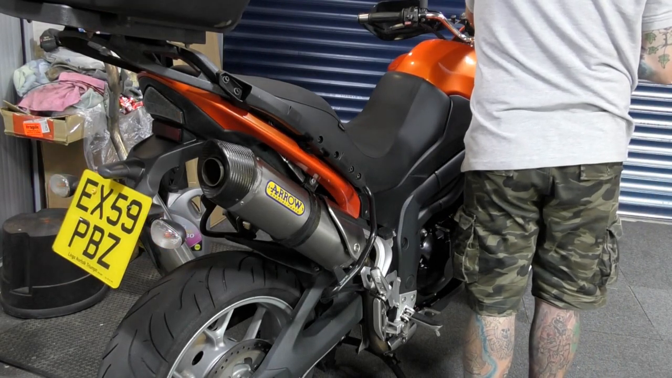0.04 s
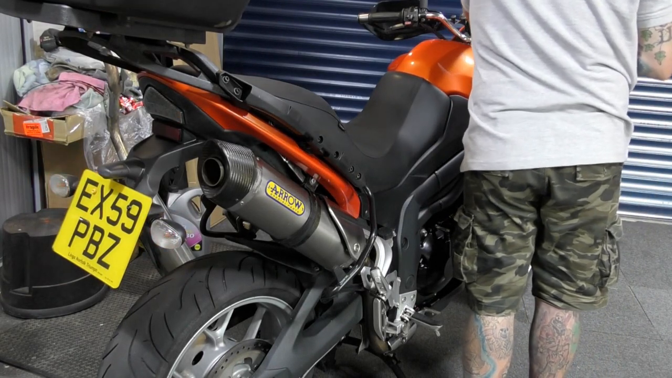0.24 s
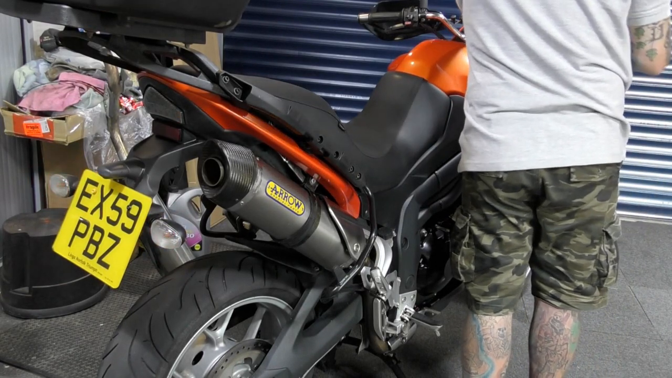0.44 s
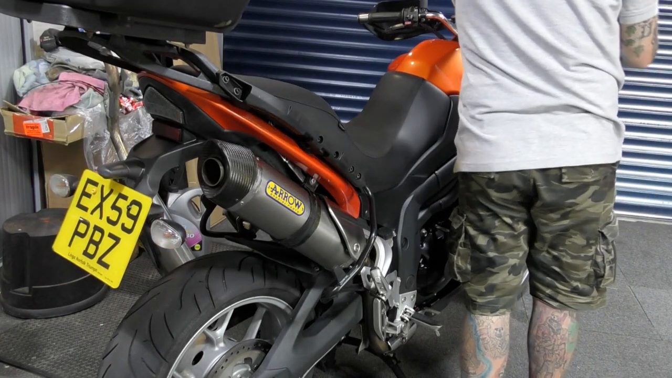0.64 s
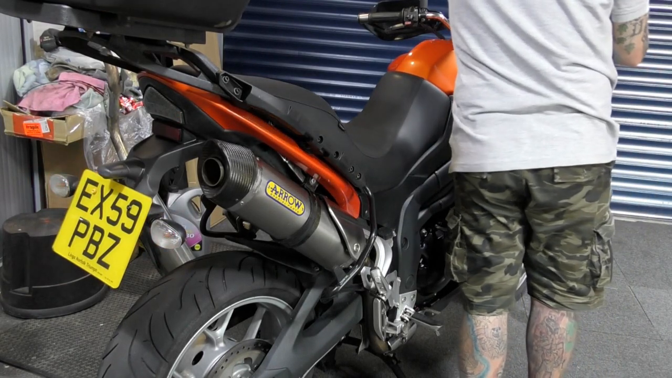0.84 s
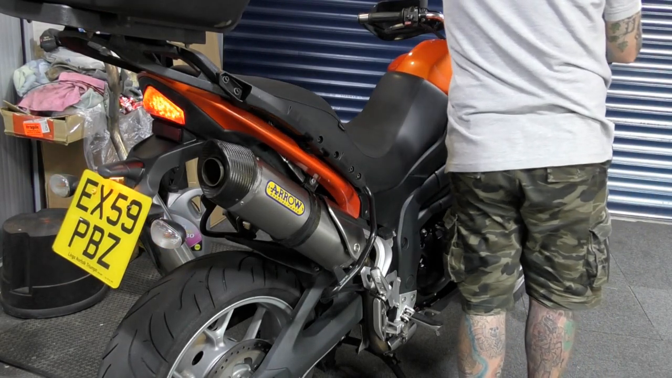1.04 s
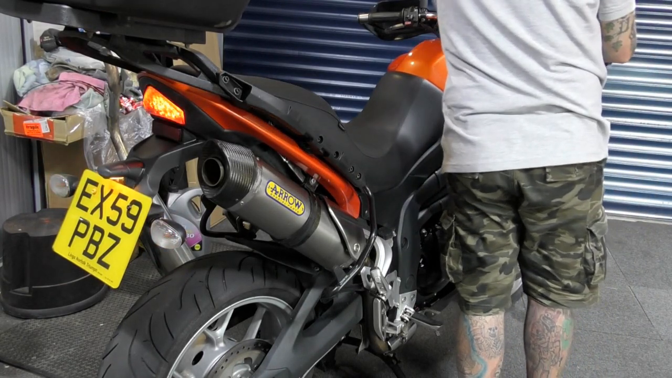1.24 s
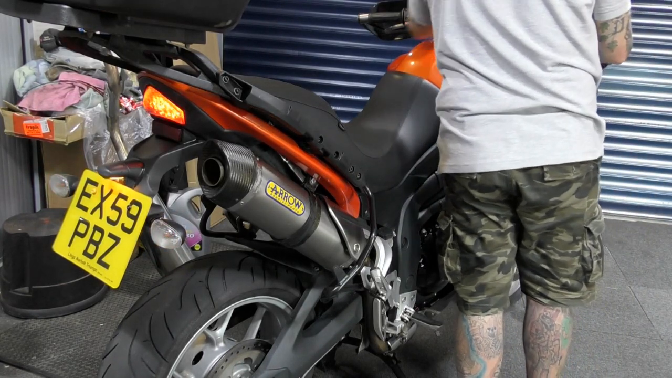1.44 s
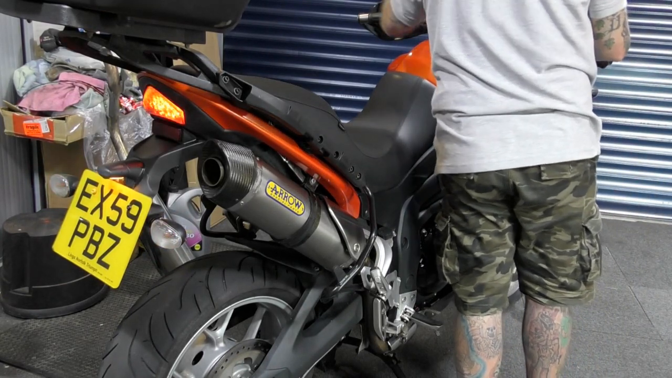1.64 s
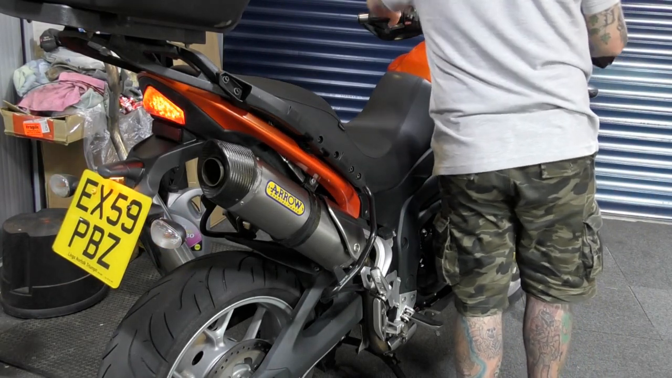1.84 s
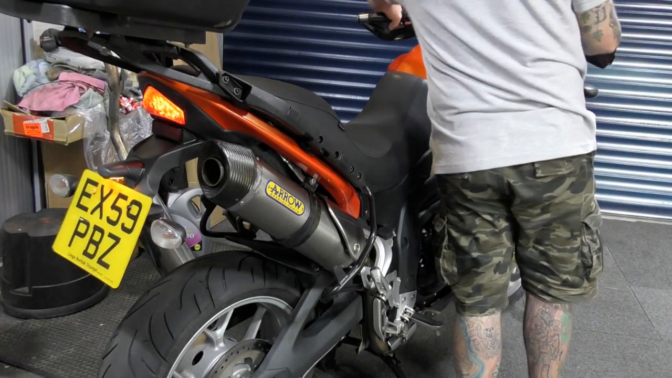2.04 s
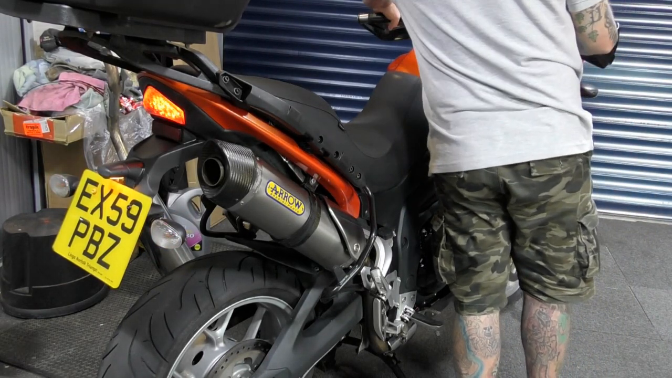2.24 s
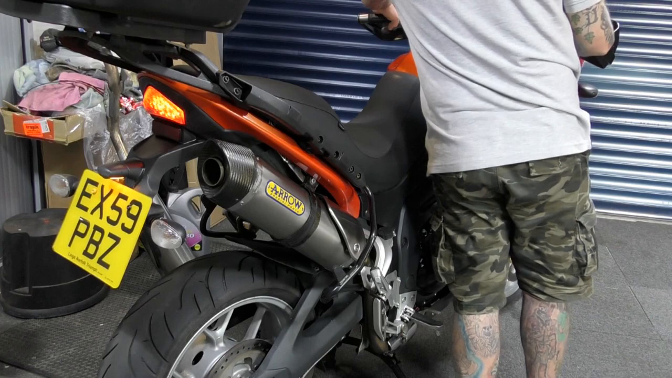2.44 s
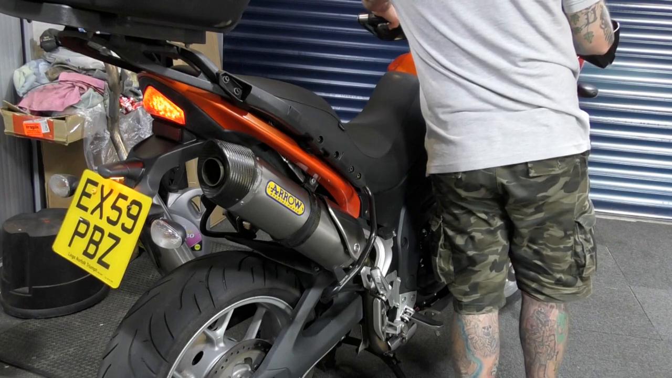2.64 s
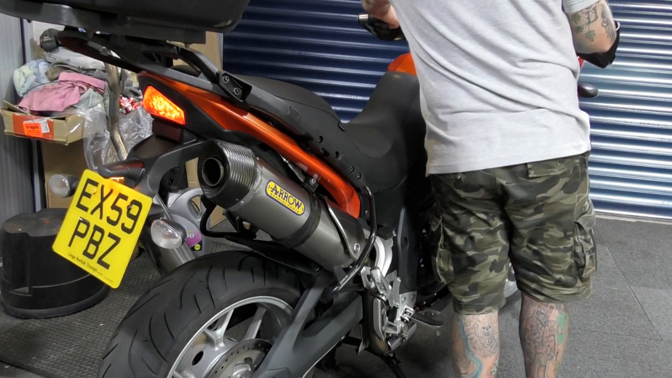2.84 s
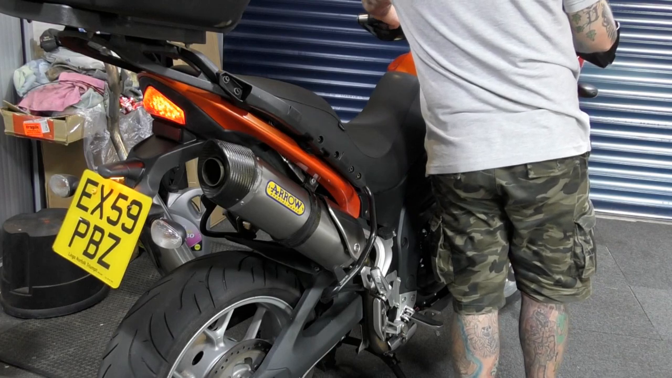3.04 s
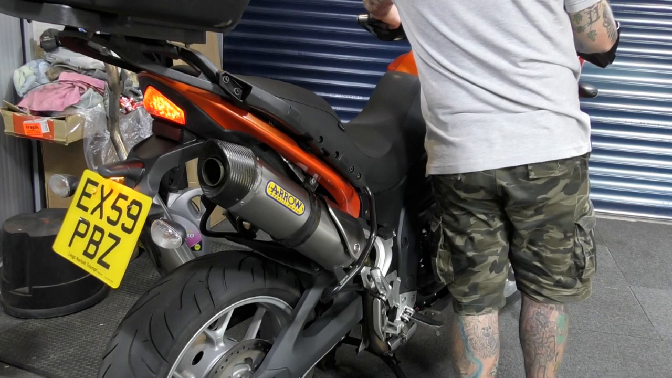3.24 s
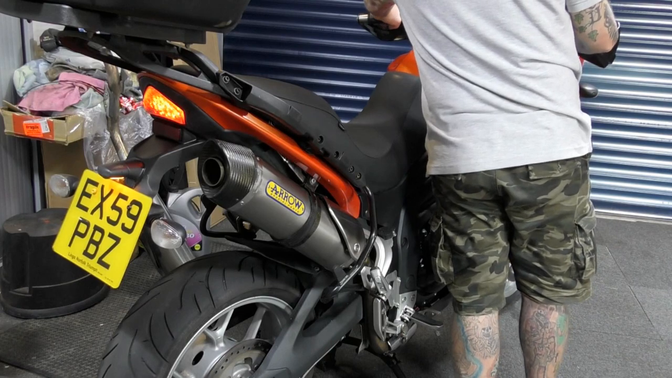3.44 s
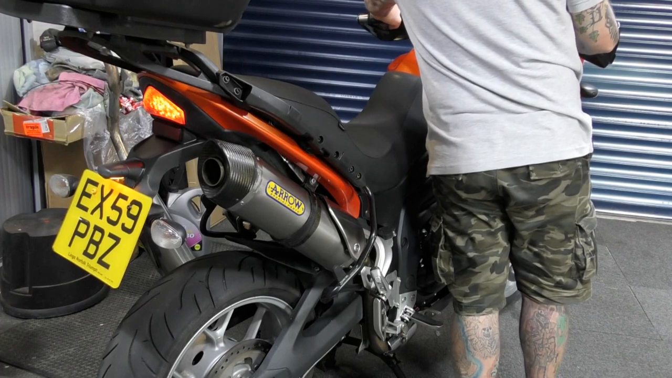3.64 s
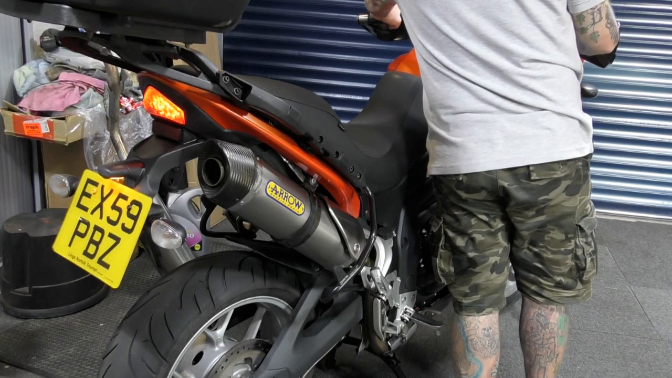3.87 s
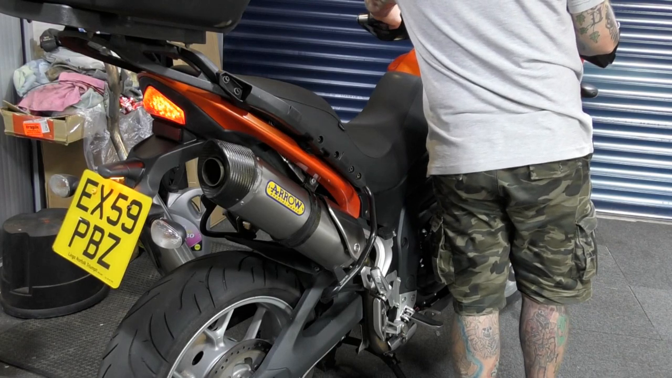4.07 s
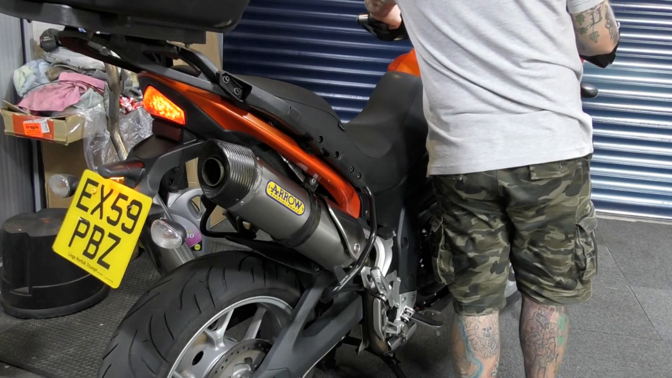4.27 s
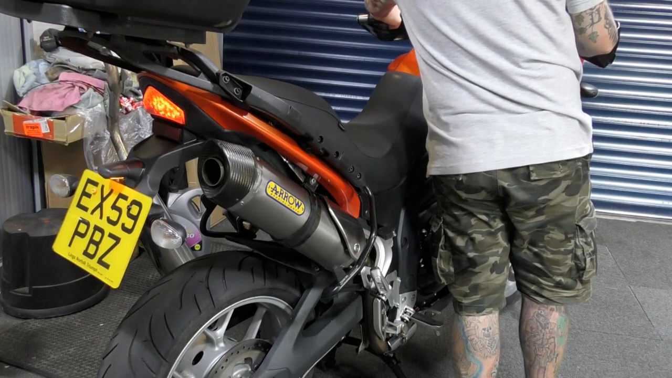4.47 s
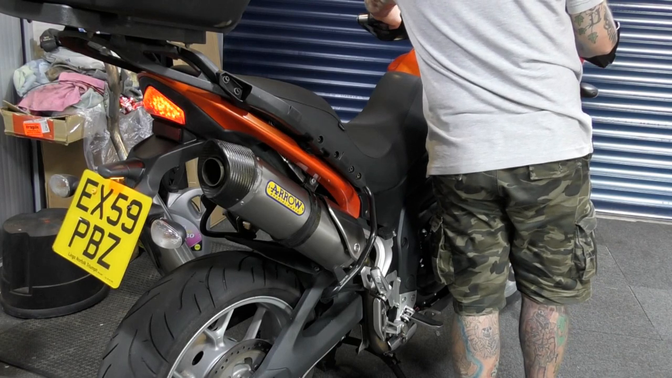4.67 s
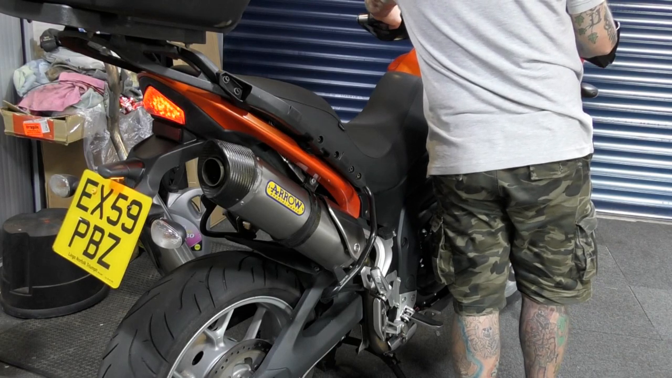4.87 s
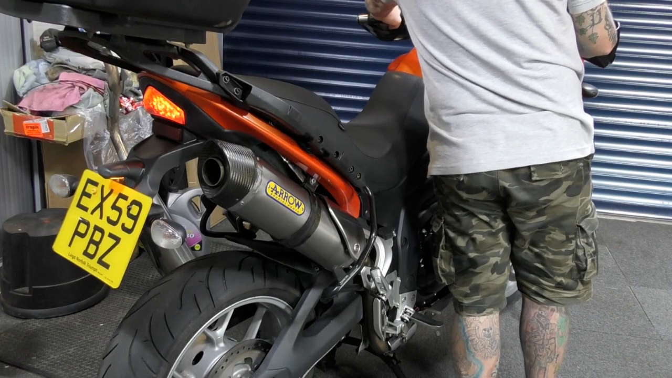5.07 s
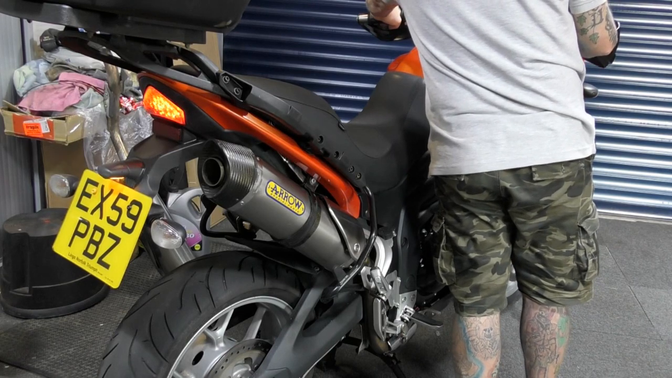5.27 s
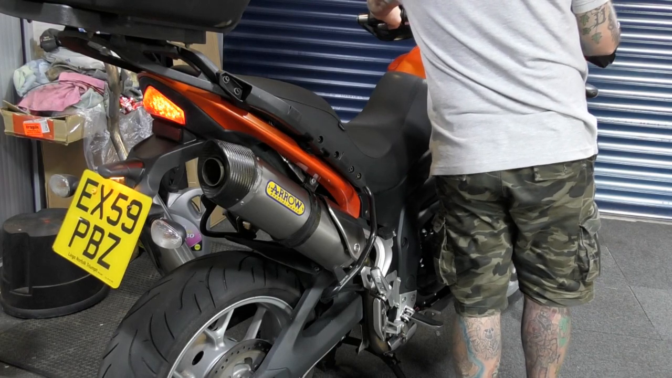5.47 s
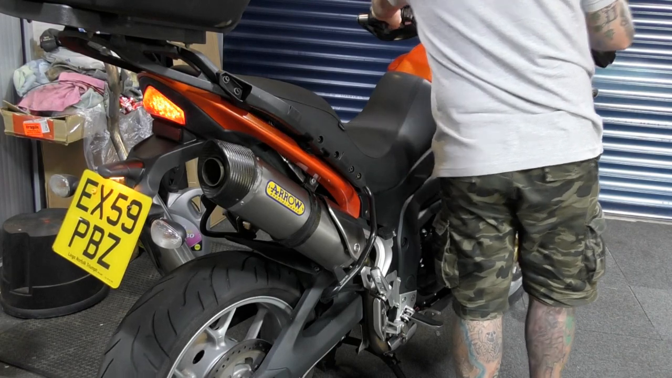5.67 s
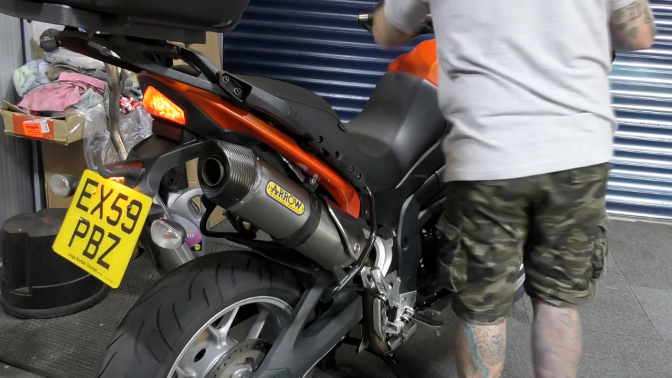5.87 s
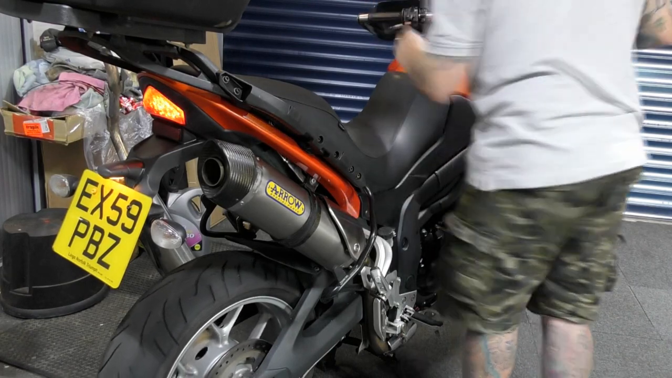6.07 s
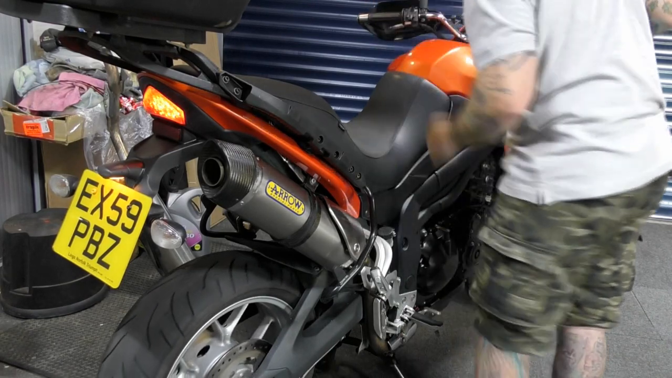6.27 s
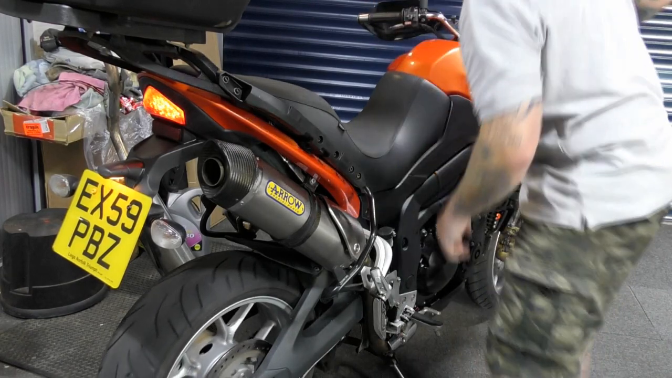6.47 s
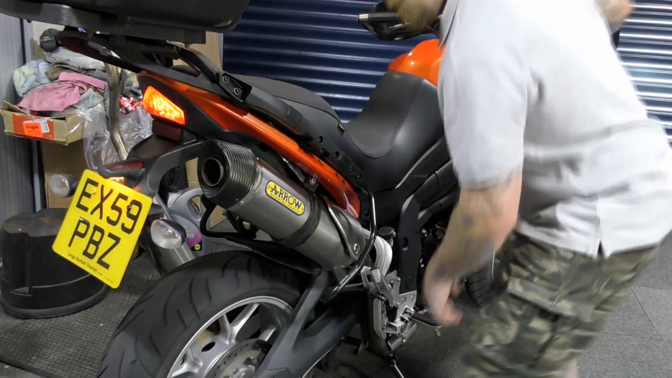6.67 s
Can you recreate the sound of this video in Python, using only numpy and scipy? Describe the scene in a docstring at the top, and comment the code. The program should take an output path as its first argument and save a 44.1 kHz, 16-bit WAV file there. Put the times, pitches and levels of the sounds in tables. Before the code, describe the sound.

Clicks and a faint high pump whine, a sharp clack, labouring starter motor, then a three-cylinder motorcycle engine booms alive and holds its throaty idle.

```python
"""A three-cylinder motorcycle engine starts in a garage, heard from behind its silencer.
Key and relays click as ringing rattles; the fuel pump primes as a thin vane whine over a rush of noise.
Gauge gears whirr as grains and the idle stepper hums. The starter grinds and sings through four
compressions, each with a puff and a clatter. Firing pulses then ring the pipe as the engine catches,
flares and settles into a fast, deep idle, with valve-gear ticks and the starter's freewheel rasp."""
import sys
import numpy as np
from scipy import signal
from scipy.fft import rfft, irfft
from scipy.io import wavfile

SR = 44100
rng = np.random.default_rng(int(sys.argv[2]) if len(sys.argv) > 2 else 0)


def unload_audio(sound):
    """Save the sound as a 16-bit wav file, at the path given as the first command line argument."""
    columns = np.transpose(np.atleast_2d(sound))
    # keep every value between -1 and 1, then stretch to whole-number steps
    steps = np.round(np.clip(columns, -1, 1) * 32767)
    wavfile.write(sys.argv[1], SR, steps.astype(np.int16))


N = 295911
T = np.arange(N) / SR

# Garage background spectrum: (frequency [Hz], level [dB])
AIR_SPECTRUM = [(15, -41), (25, -27), (53, -13), (70, -15.5), (113, -7), (174, -9.5), (234, -10.5),
                (360, -9.5), (585, -26), (901, -14.5), (2440, -18.5), (3110, -13.5), (3470, -22.5),
                (5200, -34), (15700, -26.5)]
AIR_DB = -61.5
# Echo decay: (frequency [Hz], t60 [s])
GARAGE_T60 = [(100, 0.29), (400, 0.53), (1500, 0.29), (4000, 0.26), (12000, 0.19)]
# Stereo width: (frequency [Hz], side against mid [dB])
SIDE_SPECTRUM = [(60, -9.5), (300, -15.5), (1000, -12), (2500, -11.5), (4500, -9), (6500, -20.5),
                 (13000, -100)]
# Boom between floor, shutter and walls: (round trip [s], share passed straight on [1])
WALL_BOUNCES = [(.0115, .74), (.0155, .66)]
EDGE_HZ = 15830

# Key, switch and relay clicks: (time [s], level [dB], decay t60 [s], ring [Hz],
# ring over snap [dB], tilt above 1 kHz [dB/octave])
CLICKS = [(0.047, -51.5, 0.058, 4340, 9.5, -0.5), (0.062, -63, 0.029, 4330, 8, -15),
          (0.151, -55, 0.08, 1970, -7, -5.5), (0.415, -55, 0.087, 1500, -14, -4.5),
          (0.424, -52, 0.039, 1620, 3, -9), (0.98, -48, 0.049, 4200, -22, 0),
          (0.989, -30, 0.054, 8000, -12, 12), (0.992, -29, 0.055, 2040, -8, 2),
          (1.152, -42.5, 0.028, 1430, -13, -6), (1.185, -52.5, 0.19, 2000, -6, -5),
          (1.219, -51, 0.14, 4400, -1, -1.5), (1.248, -32.5, 0.034, 960, -21, 1.5),
          (1.337, -40, 0.084, 2000, 1, 7), (1.372, -41.5, 0.039, 1350, 1.5, -5),
          (1.419, -54, 0.9, 4550, -13, 0), (1.491, -49, .12, 4400, -24, 1.5),
          (2.549, -58, 0.068, 12000, 5, 9), (4.484, -32, 0.022, 2000, 0, 5),
          (4.4887, -16, 0.029, 2000, -15, -0.5)]
# Snap spectrum of a click: (frequency [Hz], level [dB])
SNAP_SPECTRUM = [(100, -43), (350, 5.5), (600, -21.5), (1100, 7), (2000, 10), (4000, 3.5), (7500, 1),
                 (11000, -1.5), (16000, -21)]

# Pump powered from the relay until the starter takes the battery; overshoots once on spin-up
PUMP_ON_S, PUMP_OFF_S, PUMP_RISE_S, PUMP_FALL_S = 1.335, 4.49, 0.096, 0.03
PUMP_OVERSHOOT_HZ, PUMP_SETTLE_S = 4, 0.033
PUMP_VANES = 48
# Settled pump speed: (time [s], whine [Hz])
PUMP_SPEED = [(1.6, 4342), (1.85, 4364), (2.2, 4368), (3.1, 4356), (4.48, 4343)]
# Whine level: (time [s], harmonic 1 [dB], harmonic 2 [dB], harmonic 3 [dB])
PUMP_WHINE = [(1.38, -60, -78, -81), (1.53, -57.5, -73, -75), (1.87, -54, -67.5, -71),
              (2.2, -55.5, -65.5, -67), (2.65, -59, -66.5, -74), (3.12, -58, -63.5, -81),
              (3.27, -63.5, -68, -79), (3.8, -58, -76, -78), (4.48, -56.5, -73, -77)]
# Shaft tones: (shaft order [1], level against harmonic 1 [dB])
PUMP_SHAFT_TONES = [(46, -24.5), (47, -11.5), (4, -22), (13, -15), (14, -15)]
# Fuel rushing through the pump: (frequency [Hz], level [dB])
FLOW_SPECTRUM = [(29, -44), (50, -31), (100, -7), (137, -22), (179, -6), (251, -9.5), (351, -0.5),
                 (581, -20), (1140, -8), (1760, -13.5), (3530, -17.5), (4280, -9.5), (4830, -21),
                 (12600, -21), (15700, -25)]
# Flow surges while the fuel rail is empty, then holds
FLOW_HOLD_DB, FLOW_SURGE_DB, FLOW_SURGE_S, FLOW_SURGE_WIDTH_S = -57.5, 7.5, 1.41, 0.092
# First fuel gulped by the pump: (time [s], level [dB], pitch [Hz])
GULPS = [(1.382, -35, 412), (1.402, -36, 474), (1.411, -34.5, 445), (1.426, -40.5, 374), (1.454, -56, 405)]

# Gauge needles sweep up and back: (start [s], end [s], level [dB])
NEEDLE_SWEEPS = [(1.64, 2.373, -59.5), (2.616, 3.33, -59)]
NEEDLE_RISE_S, NEEDLE_FALL_S = 0.026, 0.045
# Gauge gear whirr: (frequency [Hz], level [dB])
NEEDLE_SPECTRUM = [(900, -77), (1300, 1), (1700, -9.5), (2200, 1), (2800, -6.5), (3600, -7), (6000, -40),
                   (12000, -50)]
STEPPER_ON_S, STEPPER_OFF_S, STEPPER_DB, STEPPER_RAMP_S = 2.165, 2.36, -61.5, 0.022

# Starter held on until the engine catches
STARTER_ON_S, STARTER_OFF_S, STARTER_RISE_S, STARTER_FALL_S = 4.488, 5.275, 0.0091, 0.029
# Tooth rate: labours against each compression, races as the piston passes the top
LABOUR_HZ, LABOUR_DB, RACE_HZ = 1529, -34.5, 2281
RACE_LAG_S, RACE_RISE_S, RACE_FALL_S = 0.014, 0.038, 0.019
# Almost unloaded spin-up before the first compression; SPIN_DB adds to LABOUR_DB
SPIN_S, SPIN_HZ, SPIN_DB = 4.538, 2503, 7.5
SPIN_RISE_S, SPIN_FALL_S, SPIN_FADE_S = 0.022, 0.029, 0.05
# Piston passes the top: (time [s], clatter [dB], air puff just before [dB], gear swell [dB])
COMPRESSIONS = [(4.727, -25, -40, 6.5), (4.899, -24.5, -40, 4.5), (5.046, -26.5, -41.5, 5.5),
                (5.192, -25.5, -40, 5)]
# Drive clatter: (frequency [Hz], level [dB])
CLATTER_SPECTRUM = [(150, -8.5), (400, -5), (700, -20.5), (950, 8.5), (1250, -7), (1700, 4), (2900, 1),
                    (4500, -14), (6500, -18), (8000, -13), (15000, -32)]
# Starter gear case: (frequency [Hz], level [dB])
GEARCASE_SPECTRUM = [(120, -46.5), (200, -24.5), (372, -22), (577, -23.5), (620, -17.5), (815, -19.5),
                     (927, -12.5), (1170, -10.5), (1540, -6.5), (2190, -7.5), (2580, -14), (2870, -13),
                     (4970, -27), (8750, -28), (15700, -45)]
# Starter gear pairs: (multiple of tooth rate [1], level [dB])
GEAR_TONES = [(.76, -7), (1, 0), (1.24, -13), (1.72, -15), (2, -21)]
# Starter housing resonance: (frequency [Hz], gain [dB])
HOUSING_GAIN = [(1350, -1), (1540, 1.5), (1680, -4), (1860, -5), (2020, 1.5), (2250, 1.5), (2390, -4),
                (2500, -1)]

# Engine catches short of idle speed, gathers pace and flares once
CATCH_S, SHORT_FIRINGS_PER_S, GATHER_S = 5.279, 13.64, 0.03
FLARE_S, FLARE_FIRINGS_PER_S, FLARE_WIDTH_S = 5.40, 8.9, 0.08
# Hunting idle: (time [s], rate [firings/s])
IDLE_SPEED = [(5.62, 41.5), (5.75, 42.1), (5.83, 43.7), (5.92, 42.4), (6.05, 42.9), (6.24, 44.8),
              (6.43, 43), (6.55, 44.4), (6.66, 42.6)]
# Strongest, first firings: (time [s], pulse level [dB])
HARD_FIRINGS = [(5.279, 6), (5.307, 5), (5.33, 7)]
# Pooled fuel burning in the first strokes: (time [s], peak level [dB], pitch [Hz])
THUMPS = [(5.2808, -17, 178), (5.3089, -14.5, 217), (5.3088, -18, 386), (5.3311, -33, 230)]
# Lull of weak firings once the pooled fuel has burnt
LULL_S, LULL_RISE_S, LULL_FALL_S = 5.355, 0.03, 0.046
EXHAUST_DB, EXHAUST_LULL_DB, VALVE_DB, VALVE_LULL_DB = -29.5, -9.5, -37, -6
# Pipe and silencer: (frequency [Hz], level [dB])
SILENCER_SPECTRUM = [(30, -35), (48, -52), (68, -10.5), (85, -3), (101, -20), (128, -7.5), (146, 1),
                     (160, 1.5), (174, 1.5), (196, -0.5), (214, -9.5), (238, -6), (260, -5.5), (278, -6),
                     (297, -4.5), (320, -16.5), (345, -3), (365, -7.5), (387, -7), (440, -19.5),
                     (510, -29.5), (600, -16.5), (720, -39), (1500, -56)]
# Boom balance: (frequency [Hz], left minus right [dB])
EXHAUST_BALANCE = [(85, 4), (130, 4.5), (175, -1.5), (260, -2.5), (350, -5.5), (700, -1)]
# Valve-gear ticks: (frequency [Hz], level [dB])
VALVE_SPECTRUM = [(410, -23), (700, -14.5), (797, -16), (1150, -5), (1430, -5.5), (1490, 4), (1880, -2.5),
                  (2640, -2), (3010, -2.5), (4000, -6), (4800, -14.5), (5260, -14.5), (8740, -22),
                  (12400, -23.5), (15700, -30)]
# Engine case modes: (frequency [Hz], width [Hz], level [dB])
CASE_RINGS = [(1520, 85, 14), (1810, 52, -11), (2700, 77, 4.5), (4010, 47, 2), (4170, 63, -38)]
# Starter runs down free of the engine
FREEWHEEL_S, FREEWHEEL_DB, FREEWHEEL_RISE_S, FREEWHEEL_FALL_S = 5.43, -39.5, 0.023, 0.04
# Freewheel clutch modes: (frequency [Hz], width [Hz], level [dB])
CLUTCH_RINGS = [(2970, 160, -4), (4570, 230, -13)]


def amp(db):
    """Decibels to gain."""
    return 10 ** (np.asarray(db) / 20)


def evened(x):
    """Scales to rms 1."""
    return x / np.sqrt(np.mean(x ** 2) + 1e-20)


def read(points, hz):
    """Interpolates a table on a log-frequency axis."""
    f, value = np.transpose(points)
    return np.interp(np.log(hz + 1), np.log(f + 1), value)


def curve(rows, order=1):
    """One column of a time table at every sample."""
    rows = np.array(rows)
    return np.interp(T, rows[:, 0], rows[:, order])


def add(mix, s, sound):
    """Mixes a sound in at time s."""
    part = mix[round(s * SR):][:len(sound)]
    part += sound[:len(part)]


def held(on_s, off_s, rise_s, fall_s):
    """Linear attack, hold and release of a switched motor."""
    return np.clip((T - on_s) / rise_s, 0, 1) * np.clip(1 - (T - off_s) / fall_s, 0, 1)


def swell(peak_s, rise_s, fall_s):
    """Gaussian hump of height 1 with its own rise and fall."""
    width_s = np.where(T < peak_s, rise_s, fall_s)
    return np.exp(-((T - peak_s) / width_s) ** 2 / 2)


def drift(hz):
    """Slow random motion of rms 1, low-passed near hz."""
    f = np.fft.rfftfreq(N, 1 / SR)
    spectrum = rfft(rng.standard_normal(N)) / (1 + (f / hz) ** 4)
    return evened(irfft(spectrum, N))


def colour(x, points, tilt_db=0):
    """Causal minimum-phase filter with the given spectrum; keeps the power of white noise."""
    hz = abs(np.fft.fftfreq(8192, 1 / SR))
    tilt = tilt_db * np.log2(np.maximum(hz, 1000) / 1000)
    log_gain = np.log(amp(read(points, hz) + tilt))
    minimum_phase = np.exp(np.conj(signal.hilbert(log_gain)))
    taps = np.fft.ifft(minimum_phase).real[:4096]
    return signal.oaconvolve(x, taps / np.linalg.norm(taps))[:len(x)]


def ring(x, hz, width_hz):
    """One resonant mode; keeps the power of white noise."""
    r = np.exp(-np.pi * width_hz / SR)
    pole = r * np.exp(2j * np.pi * hz / SR)
    return signal.lfilter([np.sqrt(2 * (1 - r * r))], [1, -pole], x).imag


def grains(per_s, spread_db):
    """Random small impacts of uneven size, rms 1."""
    size = amp(spread_db * np.minimum(rng.exponential(1, N), 4))
    hit = rng.random(N) < per_s / SR
    return evened(size * rng.choice([-1, 1], N) * hit)


def tail():
    """Diffuse garage echo of energy 1, each band dying at its own speed."""
    t = np.arange(SR // 2) / SR
    taps = rng.choice([-1., 1.], len(t)) * (rng.random(len(t)) < 4000 / SR) * (t > .003)
    hz, frame_s, bands = signal.stft(taps, SR, nperseg=256)
    decay = amp(-60 * frame_s / read(GARAGE_T60, hz)[:, None])
    echo = signal.istft(bands * decay, SR, nperseg=256)[1]
    return echo / np.linalg.norm(echo)


def garage(x, wet_db=-99, side_db=0, pan_db=0):
    """Direct sound and echo in the middle, another echo as the left-right difference."""
    mid = (x + amp(wet_db) * signal.oaconvolve(x, tail())[:N]) / np.hypot(1, amp(wet_db))
    width = amp(read(SIDE_SPECTRUM, np.fft.rfftfreq(N, 1 / SR)) + side_db)
    side = irfft(rfft(signal.oaconvolve(x, tail())[:N]) * width, N)
    return np.array([(mid + side) * amp(pan_db / 2), (mid - side) * amp(-pan_db / 2)])


def background_air():
    """Steady coloured noise of the garage."""
    return amp(AIR_DB) * colour(rng.standard_normal(N), AIR_SPECTRUM)


def switches():
    """Each click is a short rattle of metal parts with one ringing note."""
    out, t = np.zeros(N), np.arange(SR // 4) / SR
    for s, db, t60, hz, ring_db, tilt_db in CLICKS:
        rattle = rng.standard_normal(len(t)) * np.exp(-np.log(1000) * t / t60)
        snap = colour(rattle, SNAP_SPECTRUM, tilt_db)
        add(out, s, amp(db) * (snap + amp(ring_db) * ring(rattle, hz, 450)))
    return out


def pump_running():
    """1 while the pump has power, with ramps."""
    return held(PUMP_ON_S, PUMP_OFF_S, PUMP_RISE_S, PUMP_FALL_S)


def pump_whine():
    """The impeller spins up and settles: a vane tone with overtones and weaker shaft orders."""
    age_s = np.maximum(T - PUMP_ON_S, 0)
    lag = np.exp(-age_s / PUMP_SETTLE_S) * np.cos(2 * np.pi * PUMP_OVERSHOOT_HZ * age_s)
    hz = curve(PUMP_SPEED) * (1 - lag)
    angle = 2 * np.pi * np.cumsum(hz * (1 + .0005 * drift(30))) / SR
    vanes = sum(amp(curve(PUMP_WHINE, order=k) + .8 * drift(14)) * np.sin(k * angle) for k in (1, 2, 3))
    shaft = sum(amp(db + drift(13)) * np.sin(round(k) * angle / PUMP_VANES) for k, db in PUMP_SHAFT_TONES)
    return np.sqrt(2) * pump_running() ** 2 * (vanes + amp(curve(PUMP_WHINE)) * shaft)


def fuel_flow():
    """Fuel rushes through the pump as dense coloured grains."""
    surge = swell(FLOW_SURGE_S, FLOW_SURGE_WIDTH_S, FLOW_SURGE_WIDTH_S)
    flow_db = FLOW_HOLD_DB + FLOW_SURGE_DB * surge + .6 * drift(25)
    return pump_running() * colour(grains(9000, 2.5), FLOW_SPECTRUM) * amp(flow_db)


def gulps(swell_s=0.0024):
    """Pockets of air knock in the fuel line as the pump takes hold."""
    out, t = np.zeros(N), np.arange(SR // 10) / SR
    envelope = t / swell_s * np.exp(1 - t / swell_s)
    for s, db, hz in GULPS:
        add(out, s, amp(db) * np.sqrt(2) * envelope * np.sin(2 * np.pi * hz * t))
    return out


def gauge_needles():
    """The gauge gears whirr through each needle sweep."""
    strength = sum(amp(db) * held(start_s, end_s, NEEDLE_RISE_S, NEEDLE_FALL_S)
                   for start_s, end_s, db in NEEDLE_SWEEPS)
    return strength * colour(grains(2500, 2.5), NEEDLE_SPECTRUM)


def idle_valve(step_hz=722, overtone_db=-6):
    """A stepper motor hums briefly as it sets the idle air."""
    angle = 2 * np.pi * step_hz * T
    hum = np.sin(angle) + amp(overtone_db) * np.sin(2 * angle)
    gate = held(STEPPER_ON_S, STEPPER_OFF_S, STEPPER_RAMP_S, STEPPER_RAMP_S)
    return np.sqrt(2) * amp(STEPPER_DB) * gate * hum


def cranking(swell_rise_s=0.032, swell_fall_s=0.026):
    """Tooth rate and strength of the starter: a free spin-up, then one race per compression."""
    hz = LABOUR_HZ + (SPIN_HZ - LABOUR_HZ) * swell(SPIN_S, SPIN_RISE_S, SPIN_FALL_S)
    db = LABOUR_DB + SPIN_DB * swell(SPIN_S + RACE_LAG_S, SPIN_RISE_S, SPIN_FADE_S)
    for s, _, _, swell_db in COMPRESSIONS:
        hz = hz + (RACE_HZ - LABOUR_HZ) * swell(s + RACE_LAG_S, RACE_RISE_S, RACE_FALL_S)
        db = db + swell_db * swell(s + RACE_LAG_S, swell_rise_s, swell_fall_s)
    return hz, amp(db) * held(STARTER_ON_S, STARTER_OFF_S, STARTER_RISE_S, STARTER_FALL_S)


def starter_grind(tooth_hz, strength, grind_db=-2, shaft_throb_db=3, teeth_count=11):
    """The gears grind in their case, throbbing once a turn of the pinion."""
    angle = 2 * np.pi * np.cumsum(tooth_hz) / SR
    throb = evened(amp(shaft_throb_db * np.sin(angle / teeth_count)))
    return strength * throb * amp(grind_db) * colour(grains(3500, 0.72), GEARCASE_SPECTRUM)


def starter_whine(tooth_hz, strength, whine_db=-5, bite_db_per_octave=5):
    """Worn teeth sing unevenly at each mesh rate, louder as they run faster and near housing rings."""
    tones = np.zeros(N)
    for multiple, db in GEAR_TONES:
        mesh_hz = multiple * tooth_hz
        angle = 2 * np.pi * np.cumsum(mesh_hz * (1 + .012 * drift(150))) / SR
        uneven_tone = evened(amp(3.3 * drift(70)) * np.sin(angle))
        tones += amp(db + read(HOUSING_GAIN, mesh_hz)) * uneven_tone
    return tones * strength * amp(whine_db + bite_db_per_octave * np.log2(tooth_hz / LABOUR_HZ))


def puffs(puff_hz=76, lead_s=.002, width_s=.012):
    """Unburnt air leaves the pipe in a soft puff at each stroke."""
    out = np.zeros(N)
    for s, _, db, _ in COMPRESSIONS:
        envelope = swell(s - lead_s, width_s, width_s)
        out += amp(db) * envelope * np.cos(2 * np.pi * puff_hz * (T - s))
    return out


def compressions(clatter_s=0.023):
    """Past each compression the gear lash rattles sharply."""
    bursts = sum(amp(db) * (T > s) * swell(s, clatter_s, clatter_s) for s, db, _, _ in COMPRESSIONS)
    return colour(bursts * grains(3000, 2), CLATTER_SPECTRUM)


def firing_turns():
    """Running count of firings since the engine caught."""
    short = SHORT_FIRINGS_PER_S * np.exp(-np.maximum(T - CATCH_S, 0) / GATHER_S)
    flare = FLARE_FIRINGS_PER_S * swell(FLARE_S, FLARE_WIDTH_S, FLARE_WIDTH_S)
    return np.cumsum((curve(IDLE_SPEED) - short + flare) * (T >= CATCH_S)) / SR


def lull():
    """1 at the weakest firings after the catch, 0 at steady idle."""
    return swell(LULL_S, LULL_RISE_S, LULL_FALL_S)


def exhaust(turns, cylinder_db=1.4, header_lag_s=.00015, jitter_s=.0001, uneven_db=1.1, gas_db=-13.0):
    """Firing pulses and turbulent gas ring the pipe; a strong cylinder and unequal headers make it lope."""
    times = T[1:][np.diff(np.ceil(turns)) > 0]
    chance = rng.standard_normal((len(times), 2))
    cycle = 2 * np.pi * (np.arange(len(times)) + 1) / 3  # three cylinders
    db = uneven_db * chance[:, 0] + cylinder_db * np.cos(cycle)
    for s, hard_db in HARD_FIRINGS:
        db[np.argmin(abs(times - s))] = hard_db
    arrival_s = times - header_lag_s * np.sin(cycle) + jitter_s * chance[:, 1]
    at = (arrival_s * SR).astype(int).clip(0, N - 1)
    pulses = np.zeros(N)
    pulses[at] = amp(db) * np.sqrt(SR / np.mean(IDLE_SPEED, 0)[1])  # rms near 1 at idle
    gas_decay = np.exp(-(turns % 1) / .6) * (turns > 0)
    gas = amp(gas_db) * rng.standard_normal(N) * gas_decay
    return colour((pulses + gas) * amp(EXHAUST_DB + EXHAUST_LULL_DB * lull()), SILENCER_SPECTRUM)


def walls(x):
    """Allpass bounces spread each pulse in time and leave its colour alone."""
    for delay_s, share in WALL_BOUNCES:
        late = np.exp(-2j * np.pi * np.fft.rfftfreq(2 * N, 1 / SR) * delay_s)
        x = irfft(rfft(x, 2 * N) * (share + late) / (1 + share * late))[:N]
    return x


def thumps():
    """Pooled fuel thumps out of the pipe, each one broad swing of pressure."""
    out = np.zeros(N)
    for s, db, hz in THUMPS:
        envelope = swell(s, .55 / hz, .55 / hz)
        out += amp(db) * envelope * np.cos(2 * np.pi * hz * (T - s))
    return out


def valve_gear(turns, beat_db=-0.44, crank_db=-0.27, rings_db=-8, chain_db=-17, chain_count=35):
    """Tappets and chain tick densely, beating with crank and firings, and ring the cases."""
    angle = 2 * np.pi * turns
    crank_angle = angle * 2 / 3  # 1.5 firings a crank turn
    beat = amp(beat_db * np.cos(2 * angle) + crank_db * np.cos(crank_angle) + drift(72))
    ticks = evened(grains(6000, 1.3) * beat)
    rings = evened(sum(amp(db) * ring(ticks, hz, width_hz) for hz, width_hz, db in CASE_RINGS))
    chain = amp(chain_db + 1.9 * drift(15)) * np.sin(chain_count * angle)
    strength = amp(VALVE_DB + VALVE_LULL_DB * lull()) * (turns > 0)
    return strength * (colour(ticks, VALVE_SPECTRUM) + amp(rings_db) * rings + chain)


def overrun():
    """The freewheel clutch rasps while the starter runs down."""
    rasp = grains(2500, 2.5)
    rings = sum(amp(db) * ring(ring(rasp, hz, width_hz), hz, width_hz) for hz, width_hz, db in CLUTCH_RINGS)
    return amp(FREEWHEEL_DB) * swell(FREEWHEEL_S, FREEWHEEL_RISE_S, FREEWHEEL_FALL_S) * evened(rings)


def scene():
    """All sources in the garage; the boom of the pipe leans left or right with frequency."""
    turns = firing_turns()
    tooth_hz, strength = cranking()
    lean_db = read(EXHAUST_BALANCE, np.fft.rfftfreq(N, 1 / SR)) / 2
    boom = garage(walls(exhaust(turns)) + thumps() + puffs(), side_db=-1.5)
    boom = irfft(rfft(boom) * amp([lean_db, -lean_db]), N)
    return (garage(background_air(), side_db=2.5)
            + garage(switches(), wet_db=2.0, side_db=1, pan_db=0.5)
            + garage(pump_whine() + idle_valve(), side_db=-6, pan_db=-3)
            + garage(fuel_flow() + gauge_needles(), wet_db=-1, side_db=0.5, pan_db=-0.8)
            + garage(gulps(), wet_db=-7.0, pan_db=-3.5)
            + garage(starter_grind(tooth_hz, strength), wet_db=-0.5, side_db=3, pan_db=0.2)
            + garage(starter_whine(tooth_hz, strength), wet_db=-7)
            + garage(compressions(), wet_db=-5, pan_db=.5)
            + boom
            + garage(valve_gear(turns) + overrun(), wet_db=-9.5, side_db=1))


def record(dry):
    """Steep linear-phase low-pass at EDGE_HZ."""
    taps = signal.firwin(511, EDGE_HZ, window=("kaiser", 9), fs=SR)
    return signal.oaconvolve(dry, taps[None], "same")


dry = scene()
out = record(dry)
unload_audio(out)
```